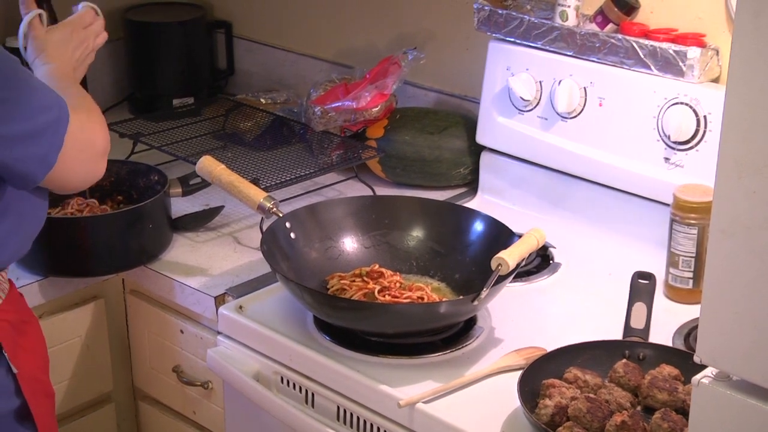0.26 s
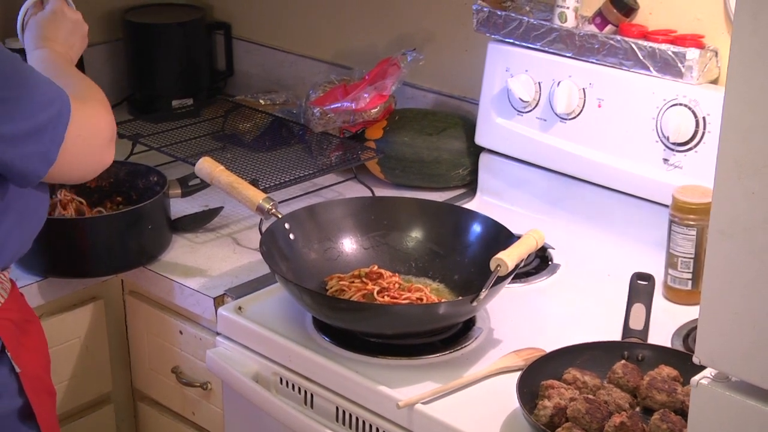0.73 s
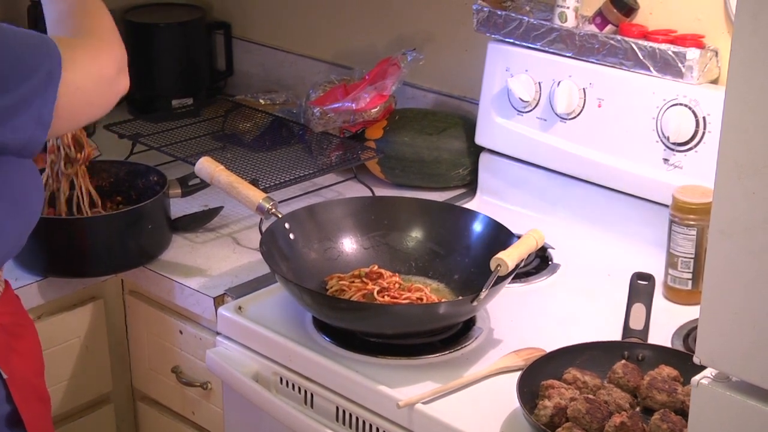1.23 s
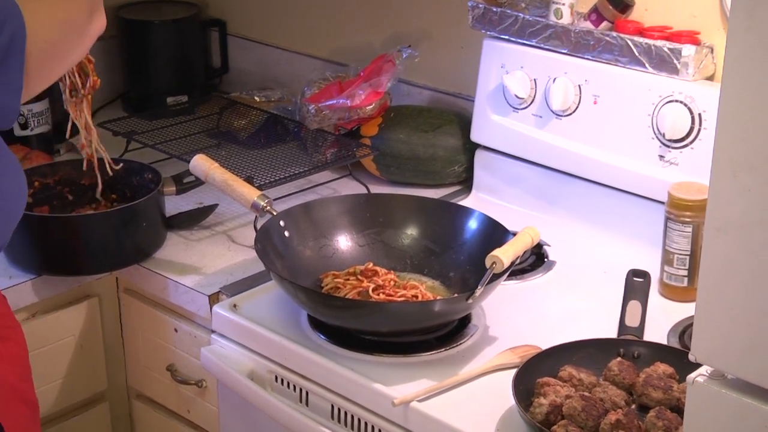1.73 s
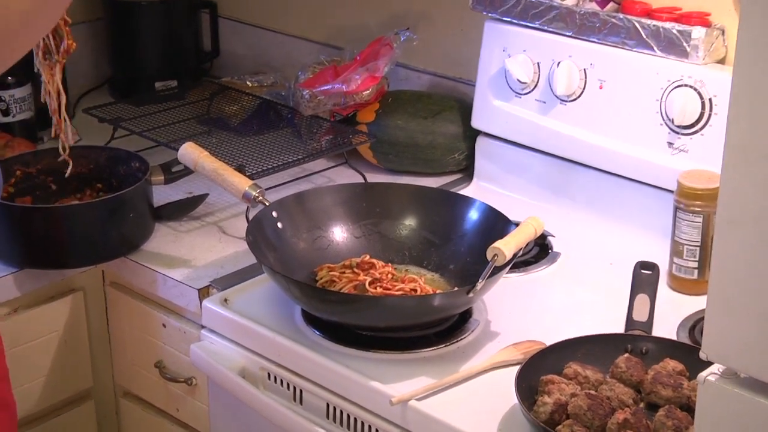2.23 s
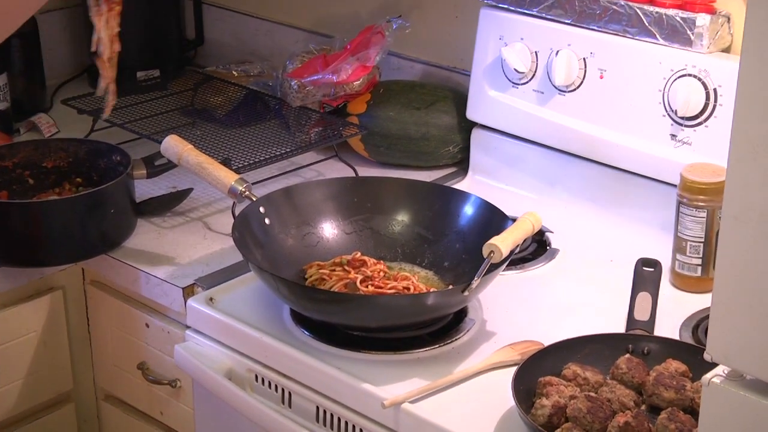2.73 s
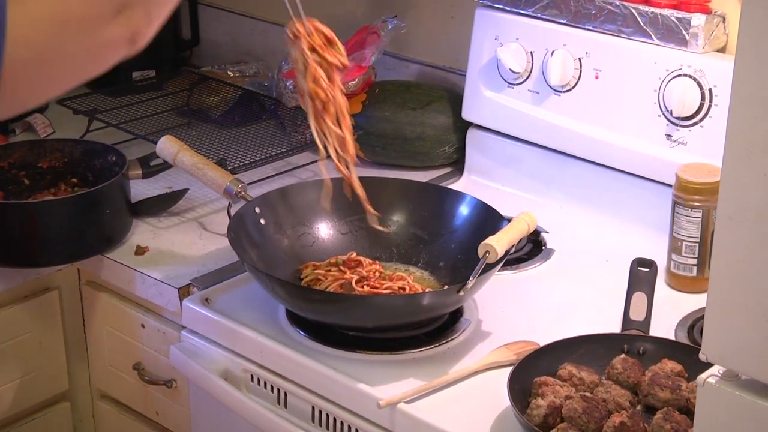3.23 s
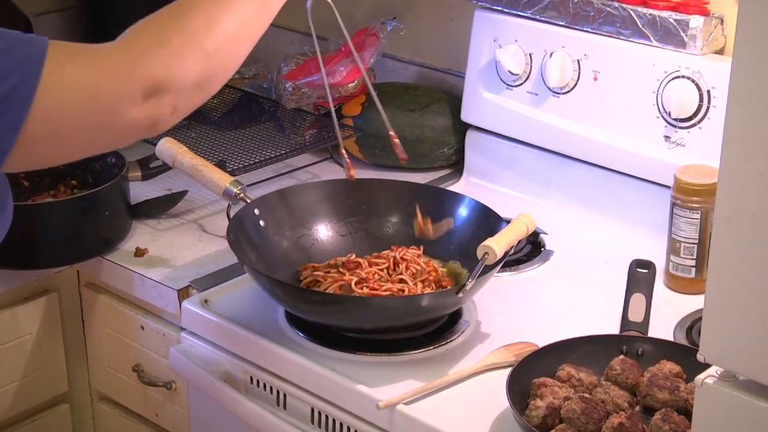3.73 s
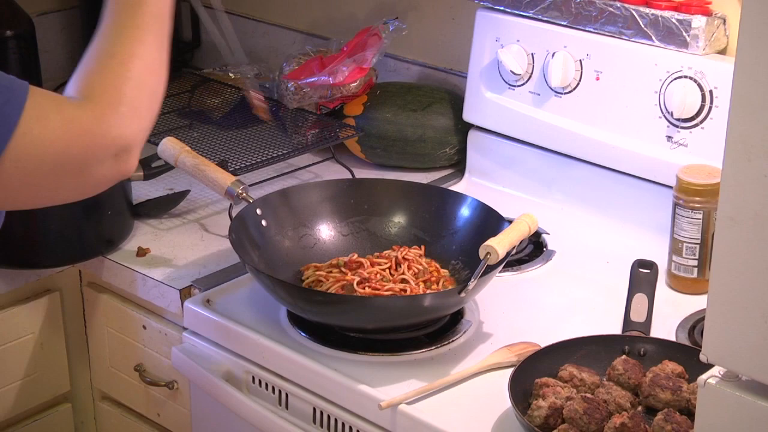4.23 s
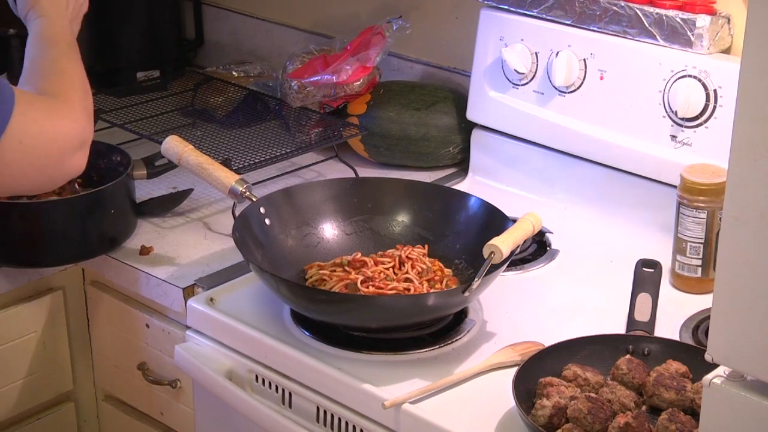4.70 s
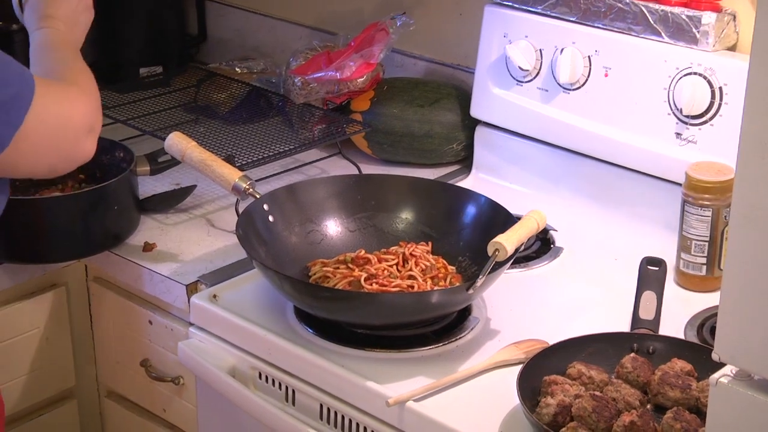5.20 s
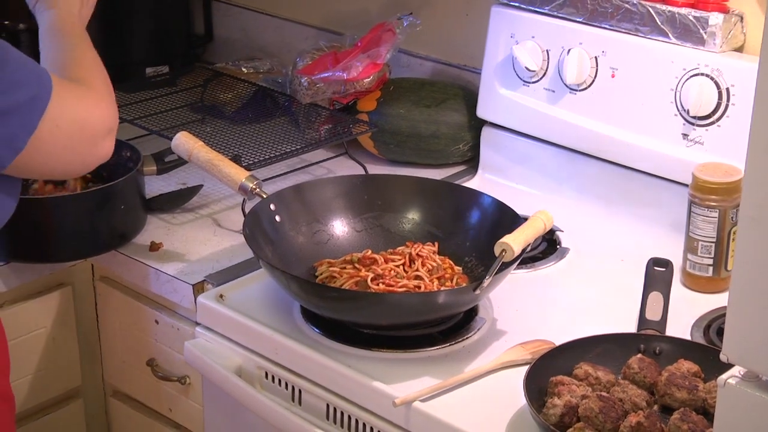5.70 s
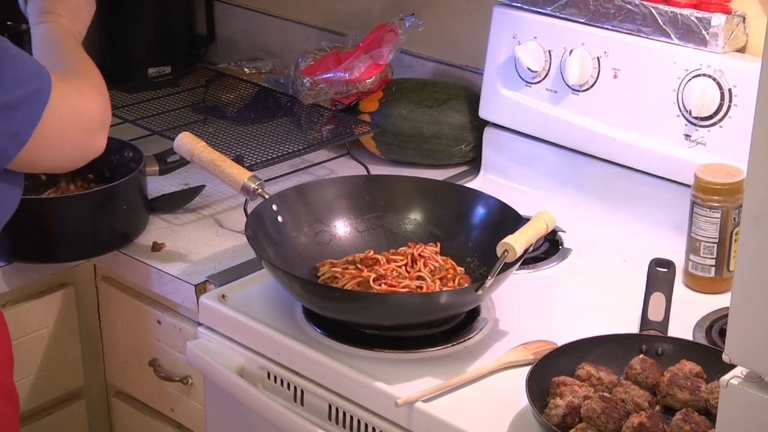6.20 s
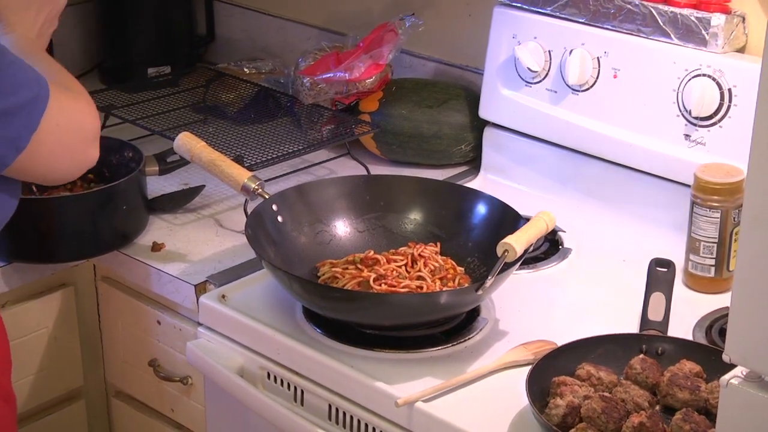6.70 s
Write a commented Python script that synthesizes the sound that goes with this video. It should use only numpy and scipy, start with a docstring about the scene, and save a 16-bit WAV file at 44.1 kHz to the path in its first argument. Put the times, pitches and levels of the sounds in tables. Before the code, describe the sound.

A close stereo microphone by a stove in a small kitchen hears butter sizzling without pause: fine fizz, fluttering crackle and scattered sharp spits of fat, including strong snaps around 2.4, 3.3, 3.9 and 5.8 seconds. At 0.34 and 0.44 steel tongs knock and scrape a pot filled with pasta, giving short, dull metallic clacks with wet squelches right behind. Small sticky noodle sounds follow at 1.0, 1.6, 2.3 and 2.7, while a faint low rumble swells from 1.6 to 2.7. Around 3.6 the pasta lands softly and wetly in the wok. Light pot scrapes and a thin clack come at 5.2 to 5.3. At 5.95 one very hard, bright clank dominates everything, then a scrape at 6.1, faint ticks at 6.2 and a crisp clack at 6.7. Quiet appliance hum and moving air remain underneath; reverberation is short.

```python
"""Spaghetti frying beside a pot

Spaghetti sizzles in butter in a wok while a cook lifts more of it, wet with sauce, out of a pot with steel tongs.
Random bursts make the frying, short rings of rising pitch the squelching noodles and the load landing in the wok.
Damped modes make the knocks on the pot, once very hard, and resonant noise the clacking tongs.
Wavering sines and coloured noise make the appliance hum, moving air and rumble of the small kitchen;
the microphone stands close to the stove."""
import sys
import numpy as np
from scipy import signal
from scipy.fft import rfft, irfft, next_fast_len
from scipy.io import wavfile
from scipy.ndimage import map_coordinates

SR = 44100
rng = np.random.default_rng(int(sys.argv[2]) if len(sys.argv) > 2 else 0)


def generate_wav(sig):
    """Save sig (samples, or channels by samples) to the path in sys.argv[1] as 16-bit PCM at SR."""
    pcm = np.round(np.clip(np.atleast_2d(sig).T, -1, 1) * 32767).astype(np.int16)
    wavfile.write(sys.argv[1], SR, pcm)


N = 306491  # length in samples

# Spectral shape of the butter's fine fizz. Each row: frequency in Hz, relative density in dB per Hz.
FIZZ_SPECTRUM = [(200, -21), (700, -7), (1700, 0.5), (2300, -3.5), (3400, -4.5), (4300, 2.5), (5000, 1.5),
                 (5700, -2.5), (7000, -4.5), (9800, -12.5), (12000, -11), (15800, -13)]
# Course of the frying, before SIZZLE_GAIN_DB is added. Each row: time in seconds, level in dB.
SIZZLE_LEVEL = [(0.0, -41.5), (0.35, -42), (1.41, -43.5), (1.76, -42), (2.8, -45), (3.21, -42), (4.97, -44),
                (6.95, -44)]
SIZZLE_GAIN_DB = 0.6
# The loudest spits of fat. Each row: start in seconds, direct peak in dB before the room's share, pitch in Hz.
LOUD_SPITS = [(0.425, -15, 5500), (1.175, -14, 5800), (1.700, -13.5, 4520), (2.425, -11.5, 6260),
              (2.738, -18.5, 1800), (3.301, -11, 7800), (3.874, -11.5, 4830), (4.018, -17, 6000),
              (4.884, -17, 4380), (5.7927, -8, 6200), (6.067, -16, 8440), (6.542, -14, 6000)]
# Lesser spits at random times: middle peak, greatest deviation from it, middle pitch.
SMALL_SPIT_DB, SMALL_SPIT_SPREAD_DB, SMALL_SPIT_HZ = -22.5, 2.5, 9400

# Wet noodles pulling apart or settling.
# Each row: start in seconds, length in seconds, rms level in dB over that length, bubble pitch in Hz.
NOODLE_SQUELCHES = [(.449, .02, -30, 1290), (0.478, .045, -32, 1700), (0.544, 0.034, -37.5, 1750),
                    (1.002, 0.021, -38.5, 1500), (1.583, 0.11, -37, 1800), (1.765, .01, -38, 1740),
                    (2.295, 0.022, -36.5, 1540), (2.735, .072, -38, 1350), (3.56, .04, -43, 1600),
                    (4.565, .039, -39.5, 1720), (4.888, .018, -38.5, 1563), (6.519, 0.027, -41.5, 2525)]
SQUELCH_RISE_OCT_PER_S = 5.7  # the cavities shrink as the strands part
# The fat sputters up briefly.
# Each row: start in seconds, length in seconds, rms level in dB over that length, bubble pitch in Hz.
FAT_SPUTTERS = [(0.014, 0.064, -39.5, 4210), (1.206, .03, -39.5, 4320), (2.999, .058, -42.5, 5470)]
# A load of pasta lands in the wok: the bubbles span a range of sizes, the small ones weaker.
LANDING_S, LANDING_LENGTH_S, LANDING_DB = 3.61, 0.1, -42.5  # level of the lowest cluster
LANDING_LOW_HZ, LANDING_HIGH_HZ, LANDING_DB_PER_OCT = 860, 4590, -0.6

# Blows and scrapes of the tongs on the pot. Each row: start in seconds,
# level in dB (rms if the energy filled 10 ms), low-pass edge in Hz, length of the chatter in seconds.
POT_CONTACTS = [(.339, -29.5, 3500, 0.0084), (.445, -23.5, 3500, .015), (5.18, -34, 444, 0.0035),
                (5.268, -31, 3500, 0.024), (5.308, -32, 990, 0.032), (5.9494, -9.5, 3400, 0.00042),
                (6.079, -27.5, 5000, .025), (6.699, -32, 3000, 0.00099), (6.903, -38, 1500, 0.0017)]
# Modes of the pot with pasta in it. Each row: frequency in Hz, relative level in dB, t60 in seconds.
POT_MODES = [(168, -11.5, 0.15), (282, -6.5, 0.092), (331, -3.5, 0.088), (390, -3, 0.055),
             (465, -10, 0.049), (653, -16, 0.1), (894, -9, 0.099), (992, -2.5, 0.098), (1054, 1, 0.14),
             (1086, -5, 0.15), (1170, -3, 0.1), (1247, -5.5, 0.1), (1420, -3.5, 0.088), (1557, -5, 0.074),
             (1900, -10, 0.16), (2156, -9.5, 0.052), (2530, -7, .07), (2820, -2, 0.092), (3480, -8, 0.13),
             (3980, -8, 0.18), (4100, -11, 0.16), (4800, -8, .15), (5053, -9, .15), (5926, -8, .15)]
# Steel tongs clacking. Each row: start in seconds, level in dB (rms if the energy filled 10 ms),
# lower band edge in Hz, upper band edge in Hz.
TONG_CLACKS = [(.338, -33, 900, 3200), (.444, -25, 800, 2200), (0.457, -29.5, 800, 1700),
               (5.283, -29, 6500, 15000), (5.946, -8.5, 2000, 8500), (6.214, -37, 8000, 13950),
               (6.234, -35.5, 3500, 8000), (6.697, -18.5, 3430, 6000)]
# Resonances of the tongs. Each row: centre in Hz, width in Hz, relative level in dB.
TONG_RESONANCES = [(1210, 1000, -5), (2780, 340, -1.5), (3850, 1140, 3), (4600, 880, 1.5),
                   (6250, 1250, 1.5), (8200, 530, -21), (11500, 3300, -21), (15000, 3000, -26)]

# Partials of the appliance hum. Each row: frequency in Hz, rms level in dB about which it wavers.
HUM_PARTIALS = [(59, -63.5), (103, -65), (217.6, -51.5), (240, -57), (360, -63), (600, -58)]
# Spectral shape of the moving air. Each row: frequency in Hz, relative density in dB per Hz.
AIR_SPECTRUM = [(15, -23), (35, -9), (75, -10), (130, -6.5), (160, -0.5), (205, 3.5), (255, -0.5),
                (310, -0.5), (460, -2), (800, -1), (1400, -8.5), (3000, -7), (8000, -16.5), (16000, -26)]
# Low rumble: a resting level, and one swell while the pasta is lifted out of the pot.
RUMBLE_DB, RUMBLE_WAVER_DB = -66, 2
SWELL_START_S, SWELL_END_S, SWELL_RAMP_S, SWELL_DB = 1.66, 2.6, 0.1, 10  # the ramps lie outside start and end

# Decay of the kitchen's reverberation. Each row: frequency in Hz, t60 in seconds.
KITCHEN_DECAY = [(150, 0.51), (1000, 0.23), (4000, 0.21), (8000, 0.14), (15000, 0.22)]
# Stereo balance of all but pot and tongs. Each row: frequency in Hz, left minus right in dB.
STOVE_BALANCE = [(100, 1.6), (1500, 1.5), (4500, 1.5), (9000, 0), (15000, 0.5)]
POT_LEAN_DB = 1.45  # pot and tongs lean to the left: left minus right
# Gain of the wall sound that differs between the capsules. Each row: frequency in Hz, gain in dB.
WALL_DIFFERENCE = [(100, -30), (2000, -33), (4500, -24), (8000, -41), (14000, -48)]
TOP_HZ = 15900  # band limit


def sizzle():
    """Boiling: countless tiny steam bubbles fizz in the butter; larger ones crackle above them in flurries."""
    fizz = coloured(bursts(per_second=3000, spread_db=5), FIZZ_SPECTRUM)
    flurries = amp(2.33 * wobble(22))
    crackle = flurries * crackles(count=2600, pitch_hz=6140, spread_db=6.5)
    boil = amp(curve(SIZZLE_LEVEL) + SIZZLE_GAIN_DB + 1.05 * wobble(12))
    return in_kitchen(boil * (amp(-0.58) * fizz + amp(-5) * crackle), wet_db=-4.5)


def bursts(per_second, spread_db):
    """Random point process: impulses at random times with log-normal sizes, the largest limited."""
    chance, size = rng.random(N), rng.standard_normal(N)
    sizes = amp(spread_db * np.minimum(size, 2.5))
    return (chance < per_second / SR) * sizes * rng.choice([-1, 1], N)


def crackles(count, pitch_hz, spread_db):
    """Damped oscillation: bubbles burst at random times, each a few cycles at its own pitch, at rms 1."""
    detune, damping, size = rng.standard_normal((3, count, 1))
    starts = rng.integers(0, N, (count, 1))
    hz = np.clip(pitch_hz * np.exp(0.48 * detune), 2500, 15000)
    cycles = 1.6 * np.exp(0.7 * damping)
    n = np.arange(SR // 200)
    rings = np.sin(2 * np.pi * hz * n / SR) * np.exp(-hz * n / SR / cycles)
    rings = rings / np.sqrt(cycles)  # long rings gain no energy
    rings = rings * amp(spread_db * np.minimum(size, 2.2))
    return unit(np.bincount((starts + n).ravel(), rings.ravel(), minlength=N)[:N])


def spits():
    """Monopole radiation: a larger droplet bursts with an abrupt snap; a few stand out of a random scatter."""
    track, t = np.zeros(N), np.arange(SR // 200) / SR
    lesser = []
    for place, size, detune in rng.random(size=(36, 3)):
        peak_db = SMALL_SPIT_DB + SMALL_SPIT_SPREAD_DB * (2 * size - 1)
        lesser.append((N / SR * place, peak_db, SMALL_SPIT_HZ * 2 ** (detune - 0.5)))
    for s, db, hz in LOUD_SPITS + lesser:
        pulsation = np.sin(2 * np.pi * hz * t) * np.exp(-t * hz)
        snap = np.diff(pulsation)  # the radiated pressure is the pulsation's rate of change
        add(track, s, amp(db) * snap / np.abs(snap).max())
    return in_kitchen(track, wet_db=-0.5)


def noodles():
    """Cavity resonance: squelching pasta, its landing and sputters of fat over a scatter of small sauce bubbles."""
    track = np.zeros(N)
    for s, length, db, hz in NOODLE_SQUELCHES:
        add(track, s, amp(db) * squelch(length, hz, SQUELCH_RISE_OCT_PER_S))
    for s, length, db, hz in FAT_SPUTTERS:
        add(track, s, amp(db) * squelch(length, hz, climb=0))
    add(track, LANDING_S, landing(count=4))
    times = rng.uniform(0, N / SR, size=400)
    for s, (detune, size) in zip(times, rng.standard_normal((400, 2))):
        hz = 1450 * np.exp(0.448 * detune)
        add(track, s, amp(-38.5 + 5.1 * min(size, 1.6)) * bubble(hz, cycles=2.1, rise=0.39))
    return in_kitchen(track, wet_db=-3.0)


def squelch(length, pitch_hz, climb):
    """Successive resonances: cavities open one after another, climbing in octaves a second, at rms 1 over length."""
    sound = np.zeros(SR // 4)
    count = 4 + int(length * pitch_hz / 14)  # small, high cavities come in greater numbers
    for order, (place, detune, size) in enumerate(rng.standard_normal((count, 3))):
        s = length * (order + 0.5 + 0.405 * place) / count
        hz = pitch_hz * 2 ** (climb * (s - length / 2)) * np.exp(0.18 * detune)
        add(sound, s, amp(5.1 * size) * bubble(hz, cycles=1.6, rise=0.25))
    return sound * np.sqrt(length * SR / np.sum(sound ** 2))


def bubble(hz, cycles, rise):
    """Resonance of an opening wet cavity: a short damped ring whose pitch climbs through hz."""
    age = np.arange(SR // 40) / SR * hz / cycles  # in decay times
    bend = rise * age * (age - 2) / (2 + age) / 2
    envelope = (1 - np.exp(-4 * age)) * np.exp(-age)
    return np.sin(2 * np.pi * cycles * (age + bend)) * envelope


def landing(count):
    """Superposition: pasta slaps into the butter and opens cavities of several sizes at once."""
    total = 0
    for hz in np.geomspace(LANDING_LOW_HZ, LANDING_HIGH_HZ, count):
        db = LANDING_DB + LANDING_DB_PER_OCT * np.log2(hz / LANDING_LOW_HZ)
        total = total + amp(db) * squelch(LANDING_LENGTH_S, hz, climb=0)
    return total


def pot():
    """Modal vibration: each contact rings the pot's damped modes; soft contact leaves the high ones out."""
    track, t = np.zeros(N), np.arange(SR // 3) / SR
    for s, db, bright_hz, length in POT_CONTACTS:
        ring = np.zeros(len(t))
        for hz, level, t60 in POT_MODES:
            decay = amp(level + rng.normal(0, 0.87) - 60 * t / t60)
            ring += rng.choice([-1, 1]) * decay * np.sin(2 * np.pi * hz * t)
        # the first few cycles of the struck wall are the strongest
        thock = np.cos(2 * np.pi * 1040 * t) * amp(-60 * t / 0.03) * (1 - np.exp(-t / 0.00056))
        rattle = rng.standard_normal(len(t)) * amp(-60 * t / 0.04)
        response = blow(ring) + amp(-4.5) * blow(thock) + amp(-1.5) * blow(rattle)
        strike = signal.fftconvolve(response, chatter(length))
        # a small pot radiates almost no bass
        radiated = lambda hz: low_pass(hz, bright_hz) * ((hz / 140) ** 2 * low_pass(hz, 138)) ** 2
        add(track, s, amp(db) * blow(filtered(strike, radiated)))
    return in_kitchen(track, wet_db=-6.5)


def chatter(length):
    """Impact and stick-slip: the contact force is one push, then a run of small slips if the steel drags."""
    slips = rng.standard_normal(SR // 10) * amp(3.2 * rng.standard_normal(SR // 10))
    drags = length > 0.003  # shorter contacts only push
    return np.concatenate([[1], drags * amp(-18.5) * slips[:max(int(length * SR), 0)]])


def tongs():
    """Forced resonance: steel chatters on steel for a few milliseconds and rings in broad clusters of modes."""
    track, t = np.zeros(N), np.arange(SR // 4) / SR
    steel = lambda f: sum(amp(db) * 1j * f * w / (c * c - f * f + 1j * f * w) for c, w, db in TONG_RESONANCES)
    for s, db, low_hz, high_hz in TONG_CLACKS:
        decay = amp(-60 * t / 0.018) + amp(-4.5) * amp(-60 * t / 0.15)
        contact = rng.standard_normal(len(t)) * decay
        band = lambda hz: (hz / low_hz) ** 2 * low_pass(hz, low_hz) * low_pass(hz, high_hz)
        add(track, s, amp(db) * blow(filtered(contact, lambda hz: steel(hz) * band(hz))))
    return in_kitchen(track, wet_db=-6.0)


def background():
    """Tones and broadband noise: a slightly unsteady hum, moving air and a faint low rumble that swells once."""
    t = np.arange(N) / SR
    hum = np.zeros(N)
    for hz, db in HUM_PARTIALS:
        level = np.sqrt(2) * amp(db + 1.6 * wobble(4.06))
        hum += level * np.sin(2 * np.pi * hz * t + 0.29 * wobble(3.05))
    air = amp(-44) * coloured(rng.standard_normal(N), AIR_SPECTRUM)
    swell = np.clip(1 + np.minimum(t - SWELL_START_S, SWELL_END_S - t) / SWELL_RAMP_S, 0, 1)
    rumble_db = RUMBLE_DB + SWELL_DB * swell + RUMBLE_WAVER_DB * wobble(7)
    rumble_spectrum = [(12, -20), (34, 1), (60, -17), (150, -60)]  # Hz, relative dB per Hz
    rumble = amp(rumble_db) * coloured(rng.standard_normal(N), rumble_spectrum)
    return hum + air + rumble


def in_kitchen(x, wet_db):
    """Reverberation: direct sound plus the answer of worktop, cupboards and walls, at about unchanged energy."""
    hz, t, z = signal.stft(rng.standard_normal(SR // 2), SR, nperseg=256)
    decay = amp(-60 * t / along(KITCHEN_DECAY, hz)[:, None])
    tail = signal.istft(z * decay, SR, nperseg=256)[1]
    tail = np.pad(tail / np.linalg.norm(tail), (SR // 400, 0))  # reflections start after 2.5 ms
    wet = signal.fftconvolve(x, tail)[:len(x)]
    return (x + amp(wet_db) * wet) / np.hypot(1, amp(wet_db))


def amp(db):
    """Logarithmic level: decibels to gain."""
    return 10 ** (np.asarray(db) / 20)


def unit(x):
    """Effective value: scale to rms 1."""
    return x / np.sqrt(np.mean(x ** 2) + 1e-20)


def blow(x):
    """Equal energy: scale to the energy of a hundredth of a second at rms 1."""
    return x * np.sqrt(SR / 100 / np.sum(x ** 2))


def along(points, hz):
    """Logarithmic frequency scale: interpolate (Hz, value) points."""
    f, v = np.transpose(points)
    return np.interp(np.log(hz + 1), np.log(f + 1), v)


def curve(rows):
    """Linear interpolation: (seconds, value) rows as one value per sample."""
    return np.interp(np.arange(N) / SR, *np.transpose(rows))


def wobble(rate):
    """Slow random modulation: a smooth curve through random knots, rate of them a second."""
    steps = np.arange(0, N + 64, 64)
    knots = rng.standard_normal(int(N * rate / SR) + 4)
    return np.interp(np.arange(N), steps, map_coordinates(knots, [steps * rate / SR]))


def filtered(x, response):
    """Linear filtering: multiply the spectrum of x by a response of frequency."""
    m = next_fast_len(len(x) + SR // 4)
    return irfft(rfft(x, m) * response(np.fft.rfftfreq(m, 1 / SR)), m)[:len(x)]


def coloured(x, spectrum):
    """Spectral shaping: x filtered by a spectrum in dB, at rms 1."""
    return unit(filtered(x, lambda hz: amp(along(spectrum, hz))))


def low_pass(hz, edge_hz):
    """Second-order system: causal low-pass response."""
    return 1 / (1 - (hz / edge_hz) ** 2 + 1j * np.sqrt(2) * hz / edge_hz)


def add(track, s, sound):
    """Superposition: mix a sound into a track at a time in seconds."""
    start = max(round(s * SR), 0)
    track[start:start + len(sound)] += sound[:max(len(track) - start, 0)]


def scene():
    """Near-coincident pickup: two capsules hear nearly the same, left a little louder; a trace of the walls differs."""
    stove = sizzle() + spits() + noodles() + background()
    utensils = pot() + tongs()
    echo = in_kitchen(stove + utensils, wet_db=30)  # almost only reflections
    walls = filtered(echo, lambda hz: amp(along(WALL_DIFFERENCE, hz)))
    channels = []
    for side in (1, -1):  # left, right
        stove_heard = filtered(stove, lambda hz: amp(side * along(STOVE_BALANCE, hz) / 2))
        utensils_heard = amp(side * POT_LEAN_DB / 2) * utensils
        channels.append(stove_heard + utensils_heard + side * walls)
    return np.array(channels)


def record(dry):
    """Saturation and band limit: the loudest peaks are squashed at full scale; nothing passes above TOP_HZ."""
    squashed = dry / (1 + np.abs(dry) ** 6) ** (1 / 6)
    return np.array([filtered(channel, lambda hz: hz < TOP_HZ) for channel in squashed])


dry = scene()
out = record(dry)
generate_wav(out)
```